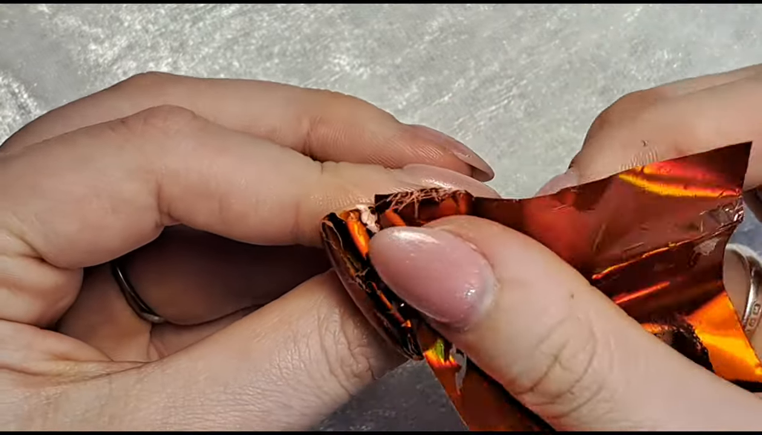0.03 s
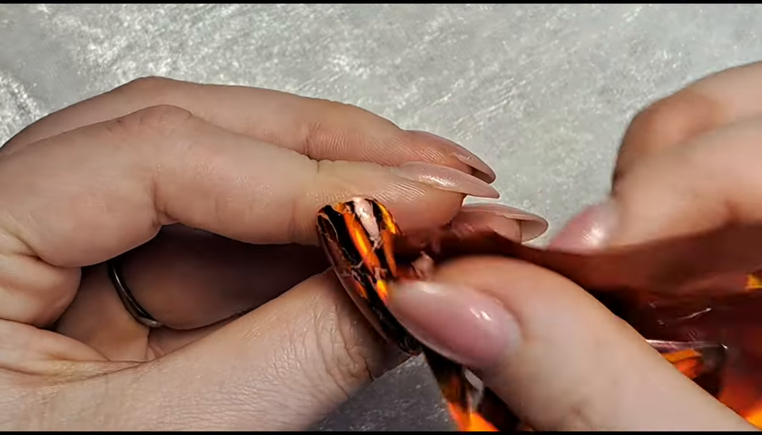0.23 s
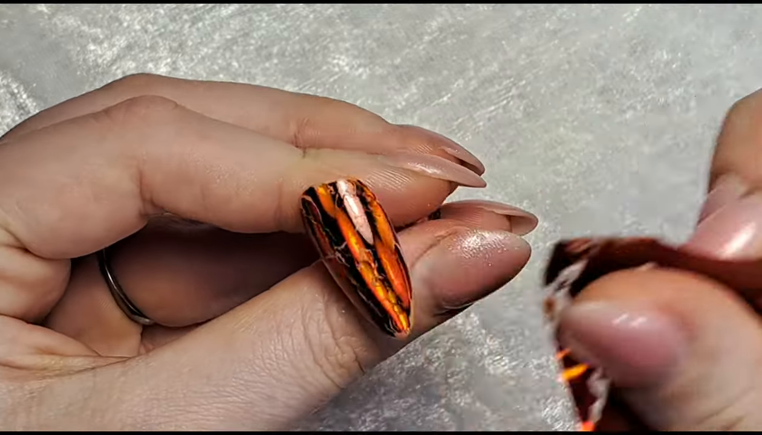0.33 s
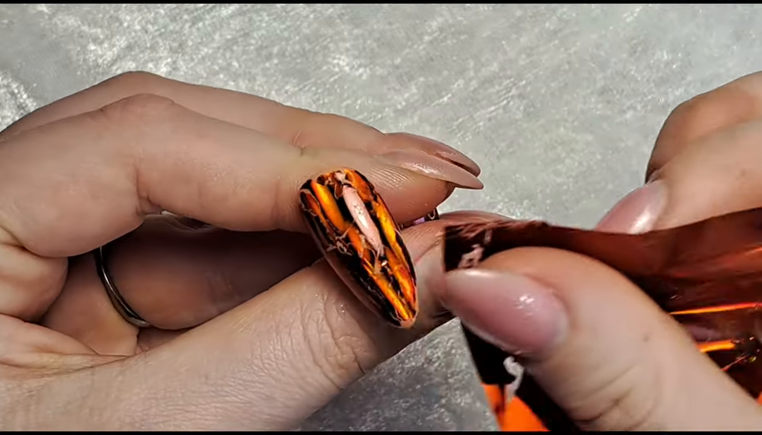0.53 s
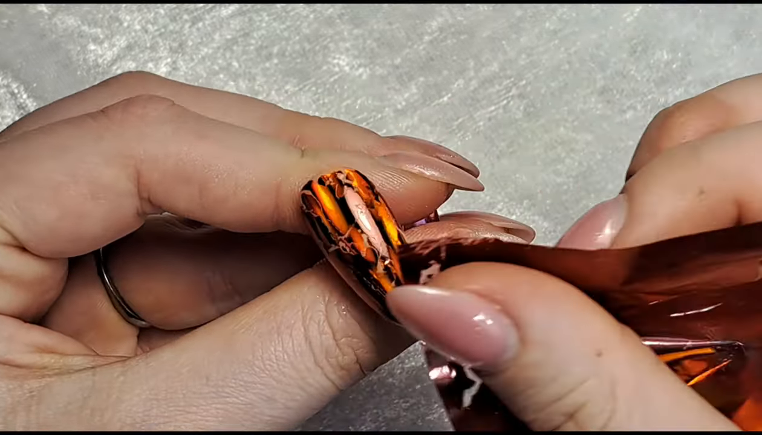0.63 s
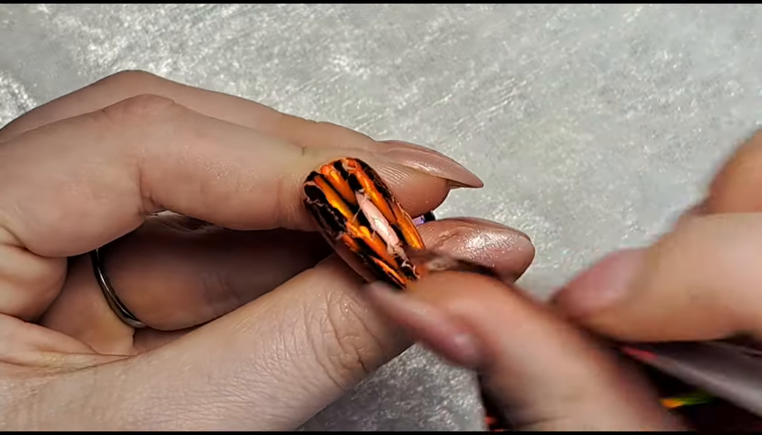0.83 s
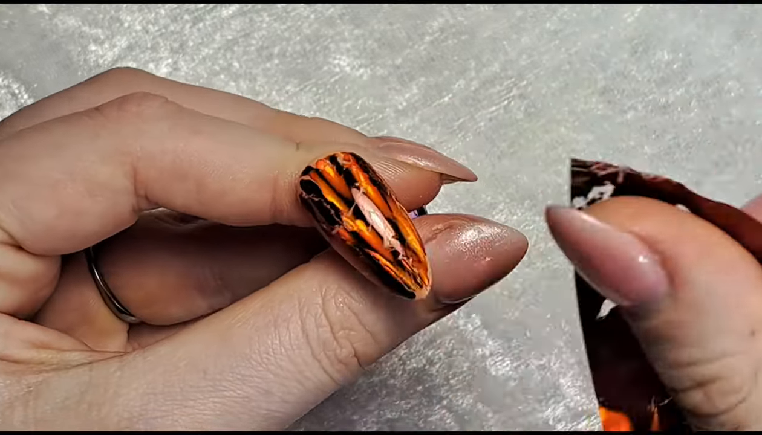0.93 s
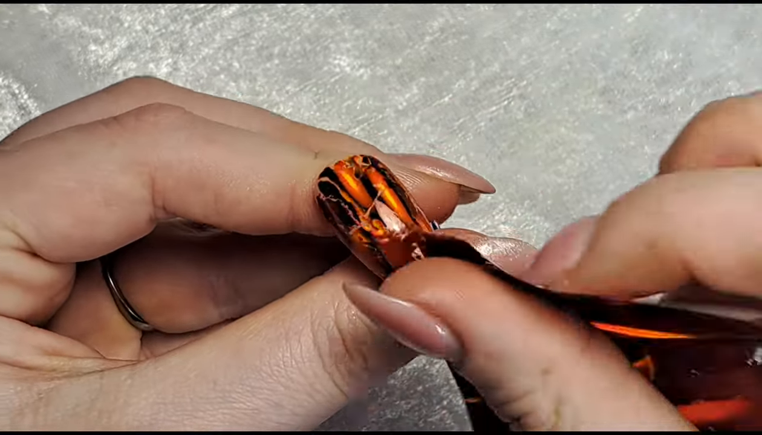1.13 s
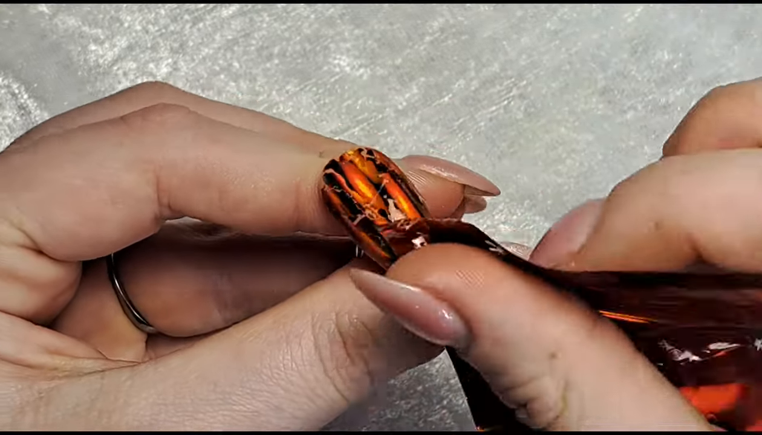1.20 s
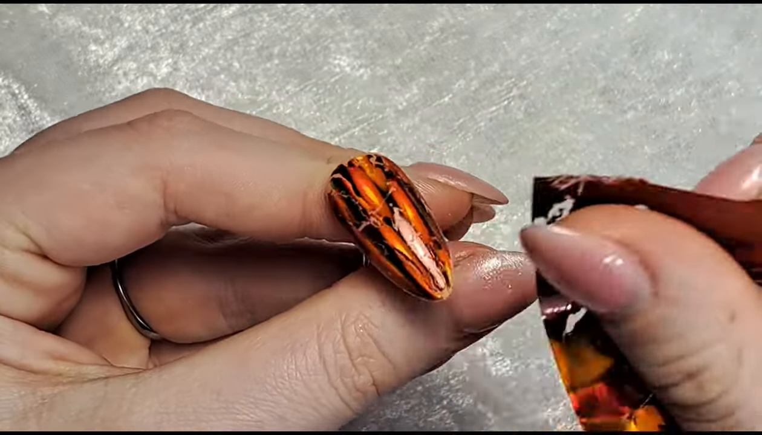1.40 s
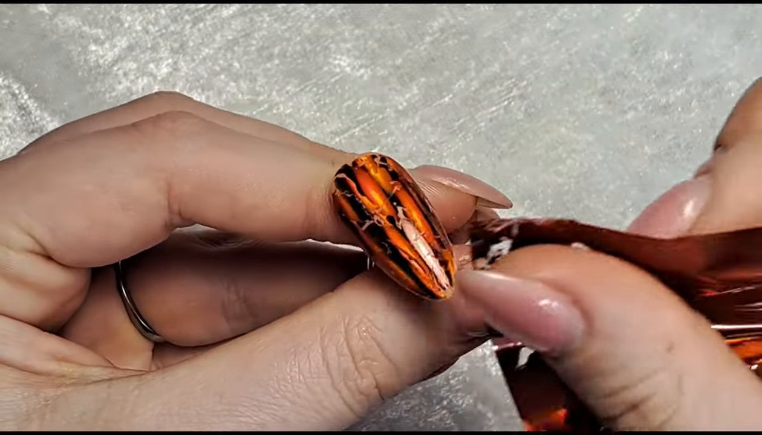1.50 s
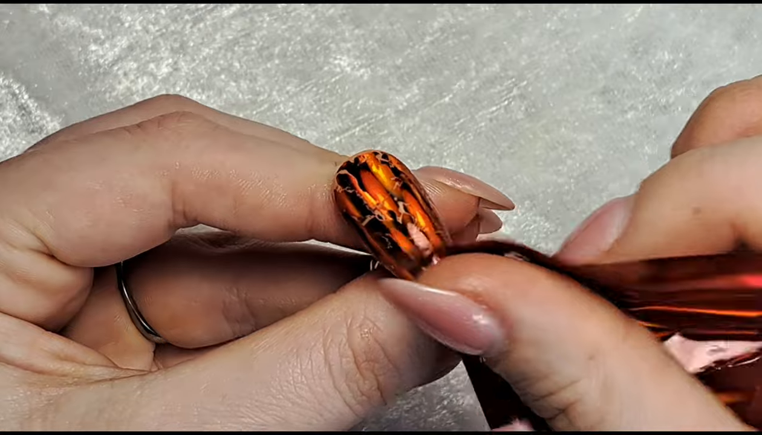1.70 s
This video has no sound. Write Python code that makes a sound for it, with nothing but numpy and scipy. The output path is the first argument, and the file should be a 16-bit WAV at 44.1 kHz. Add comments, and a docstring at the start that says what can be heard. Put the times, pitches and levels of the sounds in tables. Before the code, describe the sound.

Thin foil crinkles in quick, irregular crackles as it is pressed and peeled away.

```python
"""Thin transfer foil, pressed onto a fingernail and peeled off, close to a stereo microphone.
Creases buckle in short bright snaps that scatter off the desk; tiny creases crackle as the sheet is
pulled. The small live room answers each sound. Underneath, the fingers rub dully and a low hum
swells briefly, over quiet room tone."""
import sys
import numpy as np
from scipy import signal
from scipy.fft import rfft, irfft
from scipy.io import wavfile

SR = 44100
rng = np.random.default_rng(int(sys.argv[2]) if len(sys.argv) > 2 else 0)


def generate_wav(sig):
    """Save sig (samples, or channels by samples) to the path in sys.argv[1] as 16-bit PCM at SR."""
    pcm = np.round(np.clip(np.atleast_2d(sig).T, -1, 1) * 32767).astype(np.int16)
    wavfile.write(sys.argv[1], SR, pcm)


N = 77175
SIZE = 2048   # samples in one snap or one filter

# creases that snap: (time [s], level [dB], low body [dB], top brightness [dB])
CREASE_SNAPS = [(0.0064, -50.5, -28, -13), (0.0107, -51.5, -7, -3), (0.0883, -54.5, 15, -1.5),
                (0.1156, -54.5, 15, 4), (0.129, -44.5, -8, -1), (0.188, -42.5, 1, 3),
                (0.2021, -49.5, 7.5, -4.0), (0.227, -43.5, 3, -11), (0.2308, -28.5, -0.5, -3),
                (0.288, -47, 7, -32), (0.2991, -46.5, -25, -21), (0.3298, -32, 8, -8),
                (0.333, -30.0, 3, -23), (0.3414, -33, 12.5, -5.0), (0.344, -34, 17, -3.5),
                (0.3494, -35.5, 11.5, -18), (0.3548, -31, 12.5, 3), (0.3586, -25, 4.0, 6.5),
                (0.361, -23.5, 2.5, -5.5), (0.3624, -24.5, 8, -8.5), (0.4677, -49, -3, -15),
                (0.544, -59.5, -14, -12), (0.597, -56.5, 12, -7), (0.734, -45.5, -1, -1),
                (0.8266, -59, 7, 10), (0.8365, -38, -7.5, -0.5), (0.843, -35.5, 7, -2),
                (0.895, -47.5, -3.0, 3.0), (0.9182, -48.0, -3, 24), (0.9343, -40.0, -16, 0),
                (0.952, -31.5, -12.0, 5), (0.9754, -38.0, 4.5, -1.5), (1.0168, -41, 7, -4.5),
                (1.0827, -52.5, 13, -9), (1.1068, -41.5, 5.0, -1), (1.1107, -35.0, -7, 2.5),
                (1.2475, -54, 0, 20), (1.259, -42.5, -7, 5), (1.262, -38, -1.5, 3), (1.2672, -36, 5.5, 3),
                (1.3529, -42.5, -2, -8), (1.3616, -44.0, -18, 20), (1.374, -35, -3, 3.5),
                (1.3915, -38, -14, -6), (1.3952, -35.5, 1.5, 1.5), (1.3968, -35.5, -1, -9),
                (1.5332, -62.5, 0, -10), (1.6749, -40, -1, 0), (1.716, -45.5, -11, 7),
                (1.719, -44.5, 6, -6), (1.73, -50, -4, 8), (1.737, -38, -7, 20)]
# colour of the foil: (frequency [Hz], relative level [dB])
FOIL_COLOUR = [(80, -24), (200, -16), (370, -6.5), (600, -11), (1200, -5), (1600, -6), (2000, -13),
               (2700, -0.5), (3500, -3), (4200, -0.5), (5500, 4.5), (7500, 3), (12000, 7.5), (14500, 7),
               (16000, -6)]
# fine crackle as the sheet is pulled: (time [s], level [dB])
PULL_LEVEL = [(0, -51), (.06, -72), (.09, -60.5), (.21, -63), (.322, -46.5), (.335, -32.5), (.365, -38),
              (.39, -66.5), (.68, -74.5), (.81, -65), (.85, -50), (.92, -63.5), (.965, -42), (1.005, -51),
              (1.05, -66), (1.23, -84), (1.265, -45), (1.31, -57), (1.35, -62), (1.398, -40), (1.44, -67),
              (1.66, -78), (1.725, -46.5), (1.75, -58)]
# the sheet throws its treble left and its body right: (frequency [Hz], left minus right [dB])
FOIL_AIM = [(350, 1), (900, -2), (2800, -2.5), (5000, -.5), (9000, 2.5), (15000, 1.5)]
# colour of the room's answer: (frequency [Hz], gain [dB])
ROOM_COLOUR = [(100, 1), (370, 3.5), (700, 4.5), (1400, 2.5), (2800, 1), (6000, -2.5), (11000, -7),
               (16000, -7)]
# decay of the room: (frequency [Hz], time to fall 60 dB [s])
ROOM_DECAY = [(150, 0.61), (530, 0.21), (1400, 0.25), (3700, 0.27), (9700, .28), (16000, 0.32)]
# fingers rubbing under the foil: (time [s], level [dB])
RUB_LEVEL = [(0, -83), (.15, -68), (.3, -76), (.38, -69), (.48, -67.5), (.6, -70.5), (.76, -69), (.88, -62),
             (.98, -59), (1.09, -77.5), (1.3, -66), (1.41, -92), (1.48, -75), (1.75, -77.5)]
# dull colour of the rubbing: (frequency [Hz], relative level [dB])
RUB_COLOUR = [(30, -15), (65, -17), (115, -13), (155, -4.5), (210, -2.5), (290, 6), (400, -14.5),
              (650, -12), (2000, -10), (8000, -77)]
# swell of the low hum: (time [s], level [dB])
HUM_LEVEL = [(0, -100), (.73, -97), (.79, -68.5), (.87, -59), (.9, -63.5), (.96, -83), (1.05, -100)]
# room tone and hiss: (frequency [Hz], relative level [dB])
ROOM_TONE_COLOUR = [(20, -13.5), (65, 1.5), (110, -3), (200, 5.5), (290, -8.5), (450, -10.5), (800, -28.5),
                    (1300, -19.5), (2200, -29), (5000, -25), (9000, -42), (12500, -22), (16000, -34)]
# balance of the microphone's two sides: (frequency [Hz], left minus right [dB])
MIC_BALANCE = [(60, -3.5), (200, -.5), (700, -2.5), (1400, -3), (2800, -2), (5000, -1), (9000, 1),
               (15000, .5)]

BODY_LOW_HZ, BODY_HZ, BRIGHT_HZ = 250, 1580, 7200   # edges of the foil's body band and top shelf


def snaps(attack_s=.0006, decay_s=.0006, quiver_db=-14, quiver_s=.0025, desk_db=-7):
    """Each crease buckles close to the microphone: a burst, a short quiver, a scatter off the desk."""
    out = np.zeros((2, N + 2 * SIZE))
    t, hz = np.arange(SIZE) / SR, bins(SIZE)
    quiver = from_db(quiver_db) * np.exp(-t / quiver_s)
    envelope = np.minimum(t / attack_s, 1) * (np.exp(-t / decay_s) + quiver)
    body = 1 / (1 + (hz / BODY_HZ) ** 4)
    top = 1 / (1 + (BRIGHT_HZ / hz) ** 4)
    above_bass = 1 / (1 + (BODY_LOW_HZ / hz) ** 2)
    level_window = .003 * SR   # a snap's level counts its energy as if packed into 3 ms
    for time_s, level_db, body_db, bright_db in CREASE_SNAPS:
        pan_db = 2.5 * rng.standard_normal()   # creases lie at different places on the sheet
        desk_delay_s = .0022 + .0005 * rng.uniform(-.66, 1)
        scatter = from_db(desk_db) * np.interp(t - desk_delay_s, t, envelope)
        burst = np.hypot(envelope, scatter) * sheet_noise(SIZE)
        # each crease has its own colour, with a random bump or dip every 700 Hz
        ripple_db = 2 * np.interp(hz / 700, np.arange(SIZE), rng.standard_normal(SIZE))
        shelves_db = body_db * body * above_bass + bright_db * (top - .5) * (1 - body)
        burst = colour(burst, at_hz(FOIL_COLOUR, hz) + shelves_db + ripple_db)
        burst = rms_one(burst * from_db([[pan_db / 2], [-pan_db / 2]]))
        start = int(time_s * SR)
        out[:, start:start + SIZE] += from_db(level_db - .3) * burst * np.sqrt(level_window / SIZE)
    return out[:, :N]


def crackle(grains_per_s=1500, spread_db=2.3, decay_s=.0008, gain_db=-1):
    """Tiny creases give way at random while the sheet is pulled."""
    onsets = rng.random(N) < grains_per_s / SR
    strength = from_db(spread_db * np.minimum(rng.exponential(1, N), 4))
    energy = signal.lfilter([1], [1, -np.exp(-2 / (decay_s * SR))], onsets * strength ** 2 + 1e-18)
    grains = np.sqrt(energy) * sheet_noise(N)
    hz = bins(SIZE)
    thin_db = -1.5 / (1 + (hz / BODY_HZ) ** 4)   # tiny creases have less body than the snaps
    grains = colour(grains, at_hz(FOIL_COLOUR, hz) + thin_db)
    return from_db(gain_db) * level(PULL_LEVEL) * rms_one(grains)


def sheet_noise(size, wide_hz=1440):
    """White noise as the sheet radiates it: alike left and right in the bass, less so above."""
    likeness = .3 + .7 / (1 + (bins(size) / wide_hz) ** 2)
    return irfft(stereo_spectrum(size, likeness), size)


def room_answer(sound, gain_db=-.5, delay_s=.0013, build_s=.0026, wide_hz=770):
    """The small room returns a dense, wide tail that lingers longest in the bass."""
    size = SR // 2
    t, hz = np.arange(size) / SR, bins(size)
    white = stereo_spectrum(size, likeness=.35 / (1 + (hz / wide_hz) ** 2))
    centres_hz, decays_s = np.transpose(ROOM_DECAY)
    tail = 0
    for share, t60 in zip(np.eye(len(ROOM_DECAY)), decays_s):
        band = np.interp(np.log(hz), np.log(centres_hz), share)
        tail = tail + irfft(white * band, size) * from_db(-60 * t / t60)
    tail *= 1 - np.exp(-np.maximum(t - delay_s, 0) / build_s)
    tail = colour(rms_one(tail) / np.sqrt(size), gain_db + at_hz(ROOM_COLOUR, bins(SIZE)))
    return signal.fftconvolve(sound, tail, axes=-1)[:, :N]


def finger_rub():
    """The fingers rub under the foil: dull noise that rises and falls."""
    return level(RUB_LEVEL) * soft_noise(RUB_COLOUR)


def hum(pitch_hz=156, waver_hz=4.8):
    """A low, slightly wavering hum swells and fades in the centre."""
    waver = np.interp(np.arange(N), np.linspace(0, N, 30), rng.standard_normal(30))
    phase = 2 * np.pi * np.cumsum(pitch_hz + waver_hz * waver) / SR
    return level(HUM_LEVEL) * rms_one(np.sin(phase))


def room_tone(level_db=-70):
    """The room's steady low tone and faint hiss, behind everything."""
    return from_db(level_db) * soft_noise(ROOM_TONE_COLOUR)


def soft_noise(spectrum, wide_hz=900):
    """Smooth noise, centred in the bass and wide in the treble; rms 1."""
    hz = bins(N)
    white = stereo_spectrum(N, likeness=.85 / (1 + (hz / wide_hz) ** 2))
    return rms_one(irfft(white * from_db(at_hz(spectrum, hz)), N))


def stereo_spectrum(size, likeness):
    """Left and right spectra of white noise, correlated by the given likeness."""
    pair = rfft(rng.standard_normal((2, size)))
    mid = np.sqrt((1 + likeness) / 2) * pair[0]
    side = np.sqrt((1 - likeness) / 2) * pair[1]
    return np.array([mid + side, mid - side])


def colour(x, gain_db):
    """Causal (minimum-phase) filter with the given dB at each of bins(SIZE)."""
    cepstrum = irfft(np.log(from_db(gain_db)))
    cepstrum[1:SIZE // 2] *= 2
    cepstrum[SIZE // 2 + 1:] = 0
    impulse = irfft(np.exp(rfft(cepstrum)))
    return signal.fftconvolve(x, impulse[None], axes=-1)[:, :x.shape[-1]]


def colour_sides(x, balance):
    """Colour the sides apart by (frequency [Hz], left minus right [dB]) points."""
    half_db = at_hz(balance, bins(SIZE)) / 2
    return np.vstack([colour(x[:1], half_db), colour(x[1:], -half_db)])


def from_db(db):
    """Decibels to gain."""
    return 10 ** (np.asarray(db) / 20)


def rms_one(x):
    """Scale to rms 1."""
    return x / np.sqrt(np.mean(x ** 2) + 1e-20)


def level(points):
    """Gain over time from (time [s], level [dB]) points."""
    return from_db(np.interp(np.arange(N) / SR, *np.transpose(points)))


def bins(size):
    """Frequencies of a spectrum, no lower than 1 Hz."""
    return np.maximum(np.fft.rfftfreq(size, 1 / SR), 1)


def at_hz(points, hz):
    """Read a table on a log-frequency axis."""
    table_hz, values = np.transpose(points)
    return np.interp(np.log(hz), np.log(table_hz), values)


def scene():
    """Foil up close with the room around it, over the fingers, the hum and the room tone."""
    foil = snaps() + crackle()
    left, right = colour_sides(foil, FOIL_AIM)
    direct = np.array([left, np.roll(right, 1)])   # reaches the right side one sample later
    fingers = finger_rub()
    return direct + room_answer(foil) + fingers + hum() + room_tone()


def record(dry, cutoff_hz=15700):
    """The stereo microphone's two sides differ a little in colour; the very top is cut."""
    lowpass = signal.ellip(10, .2, 70, cutoff_hz, fs=SR, output="sos")
    return signal.sosfilt(lowpass, colour_sides(dry, MIC_BALANCE))


dry = scene()
out = record(dry)
generate_wav(out)
```